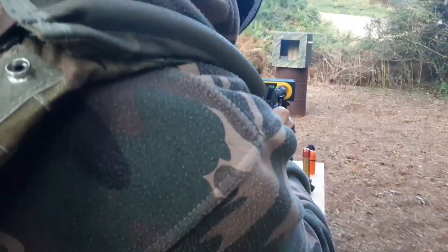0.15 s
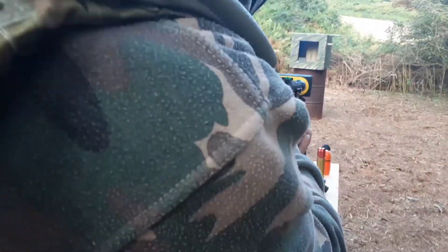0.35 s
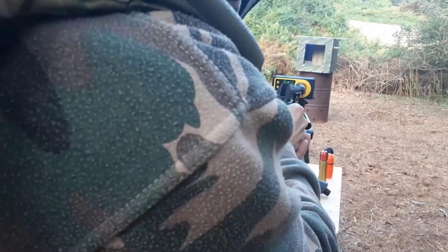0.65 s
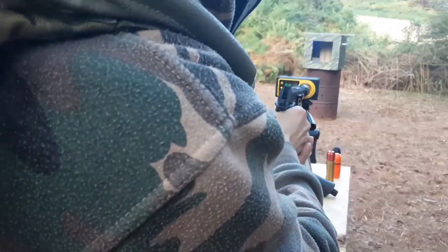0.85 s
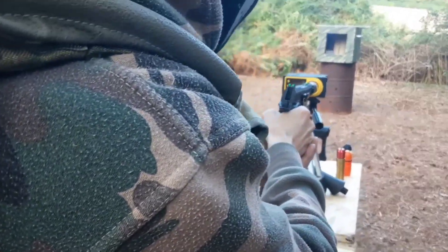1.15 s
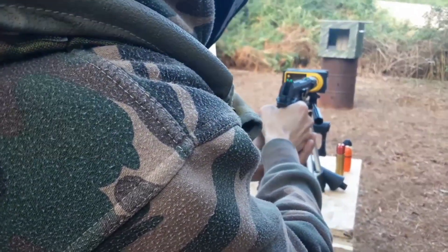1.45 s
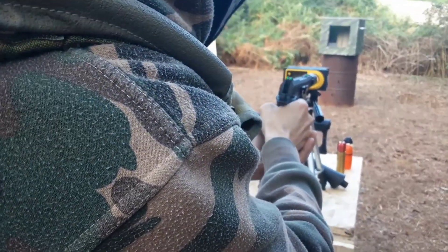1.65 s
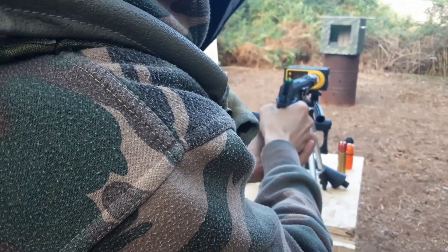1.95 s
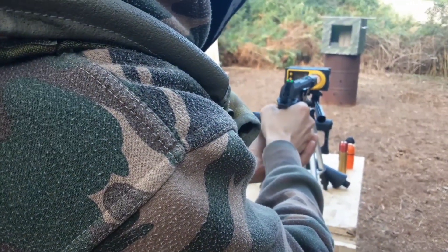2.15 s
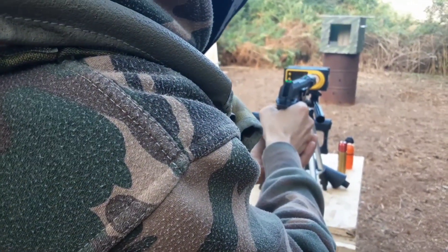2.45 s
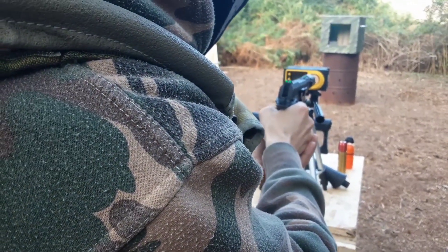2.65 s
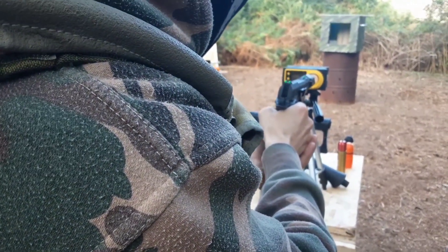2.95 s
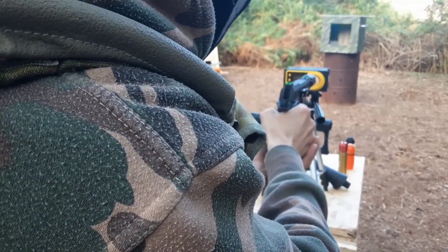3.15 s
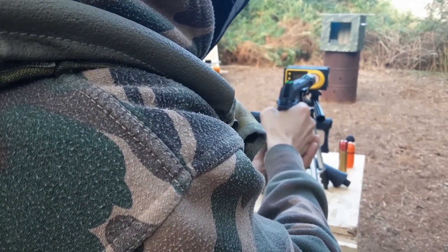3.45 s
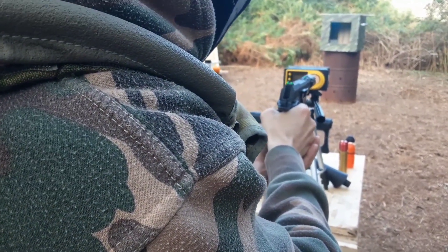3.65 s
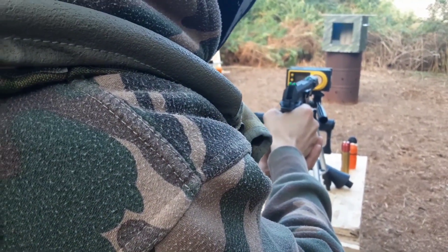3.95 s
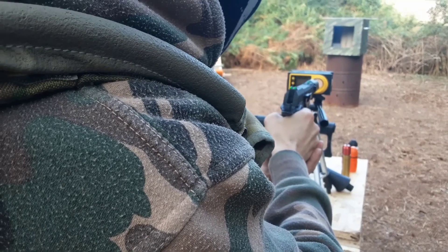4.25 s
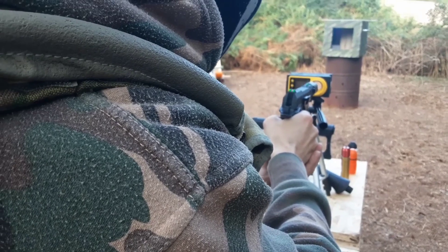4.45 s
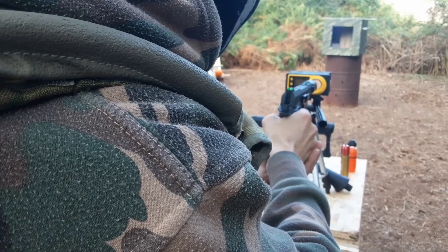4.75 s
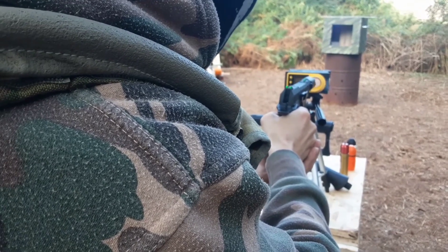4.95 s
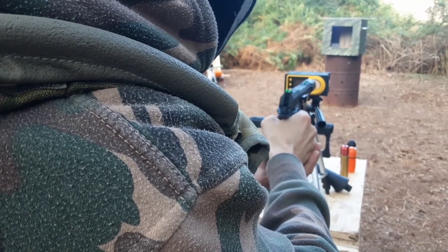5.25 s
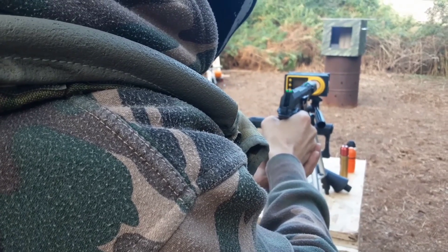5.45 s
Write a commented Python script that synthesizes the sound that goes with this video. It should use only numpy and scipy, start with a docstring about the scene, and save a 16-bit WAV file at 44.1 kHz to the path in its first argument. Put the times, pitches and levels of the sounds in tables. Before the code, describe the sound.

Close behind a shooter in the open air, seven dry gas-pistol shots ring out, the first three about a second apart, later ones quicker. Each pop has a puff of gas and rattling slide, and within a tenth of a second the pellet bangs on sheet steel, which buzzes and rings into the next shot. Traffic hum and leaf hiss lie underneath, with faint clothing ticks and one chirp before the firing.

```python
"""Outdoors, traffic and leaves hum and hiss throughout as bands of noise. Cloth and trigger tick faintly as
short noise taps, and a bird chirps once as a falling tone. Then a gas pistol fires seven single shots at a
metal target a few metres away. Each shot: the hammer's noise burst, a muzzle pop of ringing tones, a hiss of
venting gas, the slide's clacks back and home, then the pellet's clang on target and steel drum, made of noise
and ringing tones and scattered by bushes."""
import sys
import numpy as np
from scipy import signal
from scipy.io import wavfile

SR = 44100
rng = np.random.default_rng(int(sys.argv[2]) if len(sys.argv) > 2 else 0)


def gain_from_decibels(decibels):
    """Convert decibel values to linear amplitude factors."""
    exponent = np.asarray(decibels, float) / 20
    return 10 ** exponent


def transcribe(u):
    """Save the signal u as a 16-bit wav file named by the first command-line argument.

    u: samples, shape (n,) or (channels, n), limited to [-1, 1]; the rate is SR.
    q: integer samples, one column per channel.
    """
    v = np.clip(np.atleast_2d(u).T, -1, 1)
    q = np.round(v * 32767).astype(np.int16)
    wavfile.write(sys.argv[1], SR, q)


N = 246959   # length in samples
BAND_HZ = 28 * 2 ** np.arange(0, 9.3, 1 / 3)   # middles of the third-octave noise bands


def at_hz(points, hz):
    """Reads the columns of a spectrum table at given frequencies, along a logarithmic pitch scale."""
    table_hz, *columns = np.transpose(points)
    return [np.interp(np.log(hz), np.log(table_hz), column) for column in columns]


def clicks(times, sizes):
    """One-sample impulses of given sizes on a tiny constant floor."""
    out = np.full(N, 1e-18)
    np.add.at(out, np.round(np.asarray(times) * SR).astype(int), sizes)
    return out


def ring(x, hz, t60):
    """A resonance: a unit click starts a sine of height 1 that falls by 60 dB in t60 seconds."""
    r, w = gain_from_decibels(-60 / (t60 * SR)), 2 * np.pi * hz / SR
    return signal.lfilter([0, np.sin(w)], [1, -2 * r * np.cos(w), r * r], x)


def strike(modes, times, level_db, spread_db):
    """Every blow rings every mode of a body, each with a random strength of its own."""
    strengths = rng.normal(0, spread_db, (len(times), len(modes)))
    out = 0
    for k, (hz, db, t60) in enumerate(modes):
        out = out + ring(clicks(times, gain_from_decibels(level_db + db + strengths[:, k])), hz, t60)
    return out


def swell(x, rise_s, t60):
    """Turns clicks into envelopes that rise with one time constant and die by 60 dB in t60 seconds."""
    up, down = np.exp(-1 / (abs(rise_s) * SR + 1e-3)), gain_from_decibels(-60 / (t60 * SR))
    return signal.lfilter([1 - up], np.convolve([1, -up], [1, -down]), x)


def drift(corner_hz):
    """Random wandering with spread 1: noise smoothed twice, made at every 40th sample and joined by lines."""
    r = np.exp(-80 * np.pi * corner_hz / SR)
    slow = signal.lfilter([1], [1, -2 * r, r * r], rng.standard_normal(N // 40 + 2002))[2000:]
    return np.interp(np.arange(N) / 40, np.arange(len(slow)), slow / slow.std())


def noise_bands():
    """Third-octave bands of noise, equal power per Hz; neighbours come from unrelated noises."""
    white = rng.standard_normal((2, N + 8000))
    half = 2 ** (1 / 6)
    bands = []
    for k, hz in enumerate(BAND_HZ):
        band_filter = signal.butter(2, [hz / half, hz * half], "band", fs=SR, output="sos")
        bands.append(signal.sosfilt(band_filter, white[k % 2])[8000:])   # drops the filter's start
    return bands


def shares(spectrum):
    """Band gains that give the whole spectrum rms 1."""
    gain = gain_from_decibels(at_hz(spectrum, BAND_HZ)[0])
    return gain / np.sqrt(np.sum(gain ** 2 * BAND_HZ) * .232 * 2 / SR)   # a band is .232 of its middle wide


def bursts(bands, spectrum, times, level_db, tilt_db, rise_s, t60):
    """Swelling, dying noise, tilted per octave about 4 kHz; t60 is one value or one per band."""
    out, t60 = 0, np.broadcast_to(t60, BAND_HZ.shape)
    for band, hz, gain, decay in zip(bands, BAND_HZ, shares(spectrum), t60):
        if hz > 150:
            sizes = gain_from_decibels(level_db + tilt_db * np.log2(hz / 4000))
            out = out + gain * band * swell(clicks(times, sizes), rise_s, decay)
    return out


def taps(bands, spectrum, rows):
    """Sudden noise taps, each with its own start, level, tilt about 4 kHz and t60."""
    out = np.zeros(N + 8000)
    upper = slice(12, None)   # bands from about 450 Hz up
    for s, level_db, tilt_db, t60 in rows:
        at = round(s * SR)
        gain = shares(spectrum) * gain_from_decibels(tilt_db * np.log2(BAND_HZ / 4000))
        piece = gain[upper] @ [band[at:at + 8000] for band in bands[upper]]
        out[at:at + len(piece)] += piece * gain_from_decibels(level_db - 60 * np.arange(len(piece)) / SR / t60)
    return out[:N]


def coloured(x, peaks):
    """The sound plus its resonances in parallel."""
    out = x
    for hz, width_hz, lift_db in peaks:
        r = np.exp(-np.pi * width_hz / SR)
        resonance = [1, -2 * r * np.cos(2 * np.pi * hz / SR), r * r]
        out = out + gain_from_decibels(lift_db) * signal.lfilter([(1 - r * r) / 2, 0, (r * r - 1) / 2], resonance, x)
    return out


# Colour of traffic and leaves. Each row: frequency in Hz, relative power per Hz in dB.
TRAFFIC_SPECTRUM = [(26, -41), (45, -3.5), (81, 2.5), (146, -3.5), (222, -7.5), (345, -13.5), (606, -8),
                    (1360, -6.5), (2060, -11), (3370, -35.5), (7570, -40.5), (9440, -51), (11200, -44.5),
                    (15800, -49.5)]
# Background level as it reaches the listener; it drops at the first shot, as if a recorder's gain control
# turned down. Each row: time in seconds, traffic level in dB, leaf hiss level in dB (on the spectrum above).
BACKGROUND_LEVELS = [(0, -53, -42.5), (.6, -50.5, -49.5), (1.281, -50.5, -49), (1.339, -57, -56.5),
                     (4.5, -56.5, -55), (5.6, -59.5, -47.5)]


def background(bands):
    """Far traffic and leaves: each range follows its level, each band wavers a little."""
    s, *levels = np.transpose(BACKGROUND_LEVELS)
    drone, hiss = [np.interp(np.arange(N) / SR, s, column) for column in levels]
    # the low rumble swings a little less than the traffic about its mean, and sits 0.5 dB higher
    rumble = drone.mean() + 0.5 + 0.86 * (drone - drone.mean())
    traffic, leaves = 0, 0
    for band, hz, gain in zip(bands, BAND_HZ, shares(TRAFFIC_SPECTRUM)):
        if hz < 2900:
            level = rumble if hz < 300 else drone
            traffic = traffic + band * gain * gain_from_decibels(level + .7 * drift(3.0))
        else:
            leaves = leaves + band * gain * gain_from_decibels(hiss + .7 * drift(3.0))
    # the ground between swallows the traffic's treble steeply
    return signal.sosfilt(signal.butter(2, 2900, fs=SR, output="sos"), traffic) + leaves


# One faint far chirp: start in seconds, end in seconds, first pitch in Hz, last pitch in Hz, level in dB.
BIRD_CHIRP = (.540, .559, 4950, 4600, -70)


def bird():
    """A near-sine whose pitch falls faster and faster, swelling and fading once."""
    start, end, from_hz, to_hz, level_db = BIRD_CHIRP
    part = np.clip((np.arange(N) / SR - start) / (end - start), 0, 1)
    hz = from_hz + (to_hz - from_hz) * part ** 2
    return gain_from_decibels(level_db) * np.sin(np.pi * part) * np.sin(2 * np.pi * np.cumsum(hz) / SR)


# Colour of a tick. Each row: frequency in Hz, relative power per Hz in dB.
TICK_SPECTRUM = [(300, -38.5), (3000, -12), (5500, -4), (8000, -12), (9500, -12), (13000, -10),
                 (15800, -13)]
# Faint ticks. Each row: start in seconds, level in dB before the tilt, tilt in dB per octave, t60 in seconds.
TICK_ROWS = [(0.178, -56.5, -17, 0.026), (.402, -64, -8, .02), (.418, -63, 1, .017), (0.457, -64, 6, .017),
             (.470, -67, 5, .017), (.606, -65, -1, .017), (1.605, -57, -3, .044), (2.842, -66.5, -1, 0.098)]


def cloth_and_trigger(bands):
    """Small rubs and clicks: each is a sudden noise that dies at once."""
    return taps(bands, TICK_SPECTRUM, TICK_ROWS)


# When each pellet's blow is heard from the target, in seconds.
BLOW_S = [1.3715, 2.3206, 3.2567, 3.8551, 4.7157, 4.9936, 5.3689]
# How hard each blow sounds. Each row: crack level in dB, clang level in dB, clang tilt in dB per octave,
# drum ring level in dB (before the tilts and the drum tones' own levels).
BLOWS = [(-20.5, -29, 3.5, -52.5), (-18.5, -24, 2, -40), (-12, -21, 1.5, -36.5), (-12.5, -22, 1.8, -35),
         (-13, -22, 2.5, -33), (-11, -21, 1.5, -40.5), (-14, -22, 1.3, -35.5)]
# Colour of the clang. Each row: frequency in Hz, relative power per Hz in dB.
CLANG_SPECTRUM = [(120, -76), (200, -16), (490, -8.5), (1020, -25), (1200, 1), (1390, -8), (2150, 4.3),
                  (2360, -2.4), (2730, 1), (7070, 1.3), (8640, 1.5), (12500, 1.6), (15800, 0.3)]
# How long the clang lasts. Each row: frequency in Hz, t60 in seconds.
CLANG_DECAY = [(300, 1), (1000, 1), (2500, 0.38), (6000, 0.35), (12000, 0.24)]
# Broad resonances of the sheet. Each row: frequency in Hz, width in Hz, lift in dB.
PLATE_PEAKS = [(1656, 17, -0.5), (2254, 91, 1.5), (2724, 210, 2.5), (3580, 74, 2.5), (5180, 57, 4),
               (7000, 57, 0), (11860, 150, -0.5), (12670, 220, -4.5)]
# Clear tones of steel drum and target plate. Each row: frequency in Hz, level in dB before the drum's tilt,
# t60 in seconds.
DRUM_MODES = [(270, -18, .5), (452, -14, 1.5), (514, -14, 2.2), (563, -13, 2.), (600, -20, 1.2),
              (632, -17, 1.8), (670, -19, 1.), (706, -12, 1.4), (784, -13, .8), (880, -17, 1.2),
              (908, -15, 1.6), (950, -16, 1.6), (982, -19, 1.6), (1098, -15, 1.2), (1180, -10, .7),
              (1252, -15, 1.9), (1306, -13, .7), (1436, -16, 1.2), (1472, -13, .75), (1567, -15, .8),
              (1674, -14, .7), (1803, -9, .3), (1879, -11, .45), (2226, -5, .4), (2455, -9, .3),
              (2690, -7, .2), (2810, -6, .22), (3470, -8, .2), (4220, -14, .3), (12000, -3, .1)]
# Far bushes. Each row: frequency in Hz, colour in dB against the clang, t60 in seconds.
BUSHES = [(296, -15.5, 0.76), (1460, -19, 0.39), (3935, -32.5, 0.23), (12500, -41.5, 0.74)]


def target(bands):
    """The pellet cracks on sheet metal; its dense modes clang as noise, the clearer modes ring on as tones."""
    s = np.array(BLOW_S)
    crack_db, clang_db, tilt_db, drum_db = np.transpose(BLOWS)
    out = bursts(bands, CLANG_SPECTRUM, s, crack_db, tilt_db + 1.5, rise_s=.0001, t60=.003)
    # the thin plate's treble flares at once and dies first
    out += bursts(bands, CLANG_SPECTRUM, s + 0.00076, crack_db - 16.5, tilt_db + 8.5, rise_s=0.0021, t60=0.052)
    clang_t60 = at_hz(CLANG_DECAY, BAND_HZ)[0]
    out += bursts(bands, CLANG_SPECTRUM, s + 0.0009, clang_db, tilt_db, rise_s=0.011, t60=clang_t60)
    buzz = gain_from_decibels(1.5 * drift(250.) - 1)   # the loose sheet buzzes
    out = coloured(out * buzz, PLATE_PEAKS)
    # the blow spreads through the sheet over some ms; each mode has a close, faster dying twin: they beat
    for hz, db, t60 in DRUM_MODES:
        late = s + rng.uniform(.001, .012, len(s))
        twin = (hz * rng.uniform(1.006, 1.02), db, t60 * .4)
        tilted_db = drum_db + 2.5 * np.log2(hz / 1000)   # 2.5 dB per octave about 1 kHz
        out += strike([(hz, db, t60), twin], late, tilted_db, spread_db=2.5)
    # bushes farther off send back a duller wash
    under_db, wash_t60 = at_hz(BUSHES, BAND_HZ)
    wash = list(zip(BAND_HZ, at_hz(CLANG_SPECTRUM, BAND_HZ)[0] + under_db))
    return out + bursts(bands, wash, s, clang_db - 25.5, 0, rise_s=0.021, t60=wash_t60)


# Colours of the pistol's noises. Each row: frequency in Hz, relative power per Hz in dB.
HAMMER_SPECTRUM = [(180, -34.5), (300, -5), (3670, -12.5), (5380, -20), (7370, -17.5), (14500, -24),
                   (15800, -22)]
GAS_SPECTRUM = [(120, -30.5), (200, -16), (447, -7.5), (719, -12.5), (946, -18.5), (2780, -2.5), (4310, -3),
                (4990, 3.5), (9130, -0.5), (14400, -3), (15800, -16)]
SPRING_SPECTRUM = [(120, -46), (200, -21.5), (706, -12), (1120, -15), (1440, -9), (1830, -13), (4640, -4.5),
                   (7200, -4.5), (8180, 1), (13900, -9), (15800, -14)]
CLACK_SPECTRUM = [(290, -48), (500, -7), (2310, 7.5), (3130, 3.5), (5750, -0.5), (7040, 3), (11000, -2),
                  (13700, 6), (15800, -5.5)]
# When the slide stops, one row per shot: at the rear in seconds, home in seconds.
SLIDE_TIMES = [(1.3090, 1.3269), (2.2594, 2.2752), (3.1960, 3.2158), (3.7964, 3.8174), (4.6549, 4.6745),
               (4.931, 4.9512), (5.3107, 5.3328)]
# How hard it stops, one row per shot: rear level in dB, home level in dB (before the tilt).
SLIDE_LEVELS = [(-31, -20), (-31.5, -18), (-17, -17), (-16, -12.5), (-14.5, -10.5), (-27, -18),
                (-28, -16.5)]
# Sound of the stops, in the order rear, catch, home. Each row: tilt in dB per octave, t60 in seconds.
STOP_SOUNDS = [(-2, 0.011), (-1.5, 0.024), (0.8, 0.0074)]
# Broad resonances of the frame. Each row: frequency in Hz, width in Hz, lift in dB.
FRAME_PEAKS = [(713, 60, -5.5), (1166, 67, 5.5), (1994, 22, 1.5), (3310, 72, -7.5), (4784, 190, 1),
               (7240, 120, -1.5), (12500, 250, -3), (13800, 160, 4)]


def pistol(bands):
    """Hammer falls, gas vents as the slide opens, the slide clacks, its spring rattles, all through the frame."""
    s, gas_db = np.array(SHOT_TIMES), np.transpose(SHOT_LEVELS)[4]
    rear_s, home_s = np.transpose(SLIDE_TIMES)
    rear_db, home_db = np.transpose(SLIDE_LEVELS)
    out = bursts(bands, HAMMER_SPECTRUM, s - 0.0057, gas_db - 3, 0, rise_s=0.0018, t60=0.086)
    out += bursts(bands, GAS_SPECTRUM, s + 0.00091, gas_db, -0.75, rise_s=0.0033, t60=0.15)
    # the spring rattles as the slide comes home
    out += bursts(bands, SPRING_SPECTRUM, home_s, -24.5, -0.75, rise_s=0.0032, t60=0.22)
    out *= gain_from_decibels(1.3 * drift(300.) - 1)   # loose parts make it sputter
    # the slide catches the next pellet just before home
    catch_s, catch_db = home_s - .0099, -27.5 + 0 * s
    blows = [(rear_s, rear_db), (catch_s, catch_db), (home_s, home_db)]
    rows = []
    for (times, levels), stop in zip(blows, STOP_SOUNDS):
        rows += [(at, db, *stop) for at, db in zip(times, levels)]
    return coloured(out + taps(bands, CLACK_SPECTRUM, rows), FRAME_PEAKS)


# When each pellet leaves the muzzle, in seconds.
SHOT_TIMES = [1.29275, 2.24266, 3.17969, 3.77817, 4.63849, 4.91552, 5.29178]
# One row per shot: pop level in dB, barrel tone level in dB, pressure push level in dB,
# time constant of the push's fall in seconds, venting gas level in dB (played by the pistol above).
# Tones of the pop and barrel, and tilts of the gas, add their own dB.
SHOT_LEVELS = [(-8, -16, -3.5, 0.0015, -19), (-4.5, -9, -14, 0.01, -18), (-3.5, -8, -13.5, .0028, -18.5),
               (-3, -7.5, -23.5, .0026, -19.5), (-3, -6.5, -10, 0.0013, -19), (-2, -8, -20, .0074, -18),
               (-4, -9, -23.5, 0.0038, -19)]
# The pellet's exit tick, then the gas pop behind it. Each row: lag in seconds, frequency in Hz, level in dB
# added to the pop's, t60 in seconds.
POP_TONES = [(0, 4300, -2, .003), (0, 7200, -8, .006), (0, 13000, -9, .005), (.00026, 1900, -1, .0055),
             (.00026, 3400, -9, .006), (.0004, 5600, -8, .005)]
# Air column in the barrel. Each row: frequency in Hz, level in dB added to the barrel's, t60 in seconds.
BARREL_MODES = [(570, 5, 0.0049), (713, -15, 0.053)]


def muzzle():
    """The same mix of tones pops every shot; then barrel air rings and a slow push of pressure passes."""
    s = np.array(SHOT_TIMES)
    pop_db, barrel_db, push_db, push_s = np.transpose(SHOT_LEVELS)[:4]
    out = sum(ring(clicks(s + lag, gain_from_decibels(pop_db + db)), hz, t60) for lag, hz, db, t60 in POP_TONES)
    out -= strike(BARREL_MODES, s + .0002, barrel_db, spread_db=1.5)   # minus: it starts as suction
    for at, db, length in zip(s, push_db, push_s):
        out += swell(clicks([at], gain_from_decibels(db)), 0.00055, length * np.log(1000))   # time constant to t60
    return out


def scene():
    """All sources at one microphone behind the shooter."""
    near, far = noise_bands(), noise_bands()
    shots = muzzle() + pistol(near)
    small_sounds = cloth_and_trigger(near) + bird()
    return (shots + small_sounds + target(far) + background(noise_bands()))[None]


def top_cut(x):
    """Nothing passes above the cut-off."""
    return signal.sosfilt(signal.butter(12, 16810, fs=SR, output="sos"), x)


def record(dry):
    """A steep low cut turns each push into a falling thump; the port dips near 9 kHz; peaks round, top is cut."""
    dry = signal.sosfilt(signal.butter(5, 52, "high", fs=SR, output="sos"), dry)
    dry = dry - .55 * signal.lfilter(*signal.butter(1, [8000, 10200], "band", fs=SR), dry)
    rounded = 1.3 * np.tanh(dry / 1.3)
    cut = signal.sosfilt(signal.ellip(8, .5, 36, 15550, fs=SR, output="sos"), rounded)
    cut = signal.sosfilt(signal.cheby2(12, 60, 17200, fs=SR, output="sos"), cut)
    return top_cut(cut)


dry = scene()
out = record(dry)
transcribe(out)
```